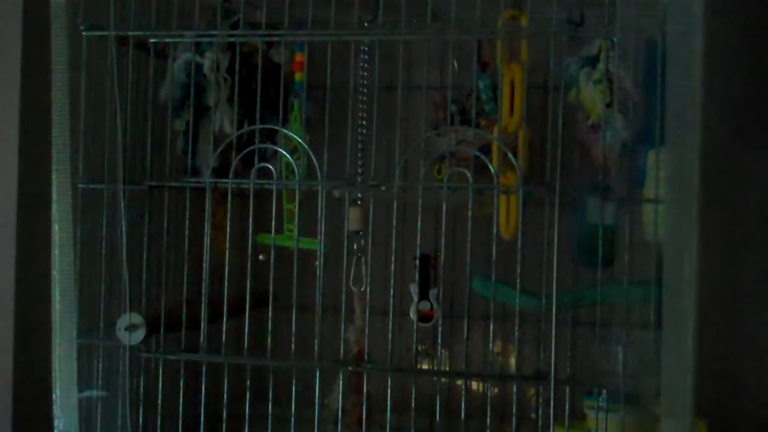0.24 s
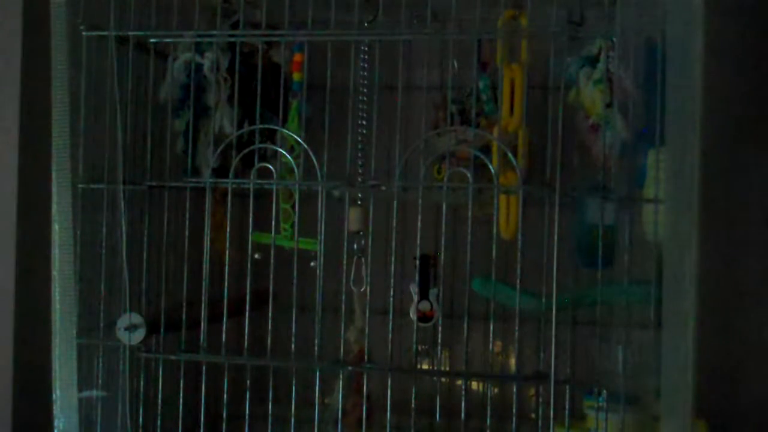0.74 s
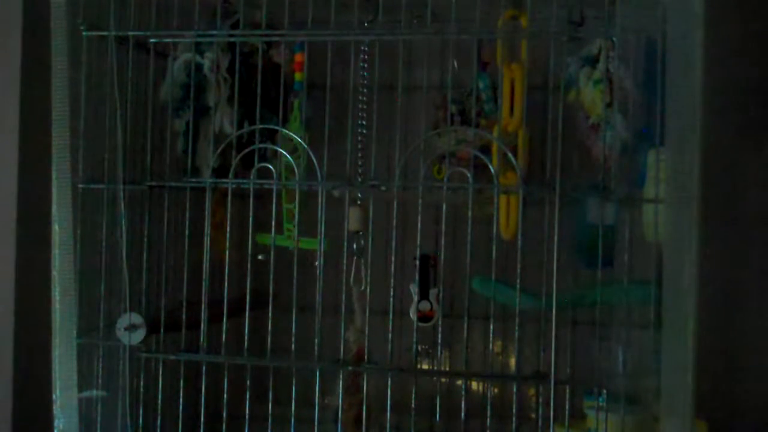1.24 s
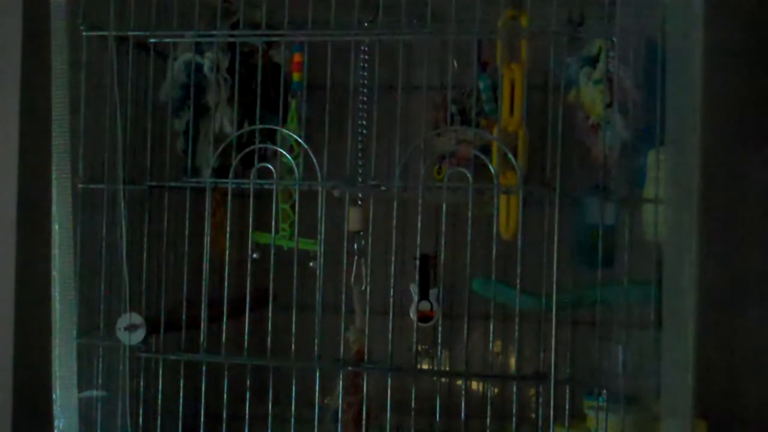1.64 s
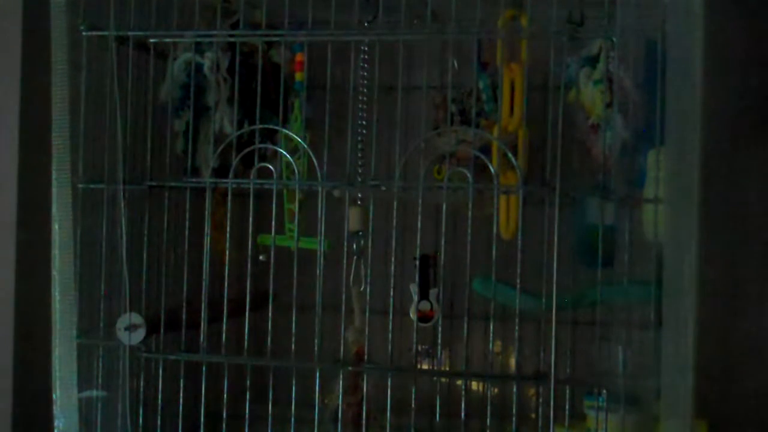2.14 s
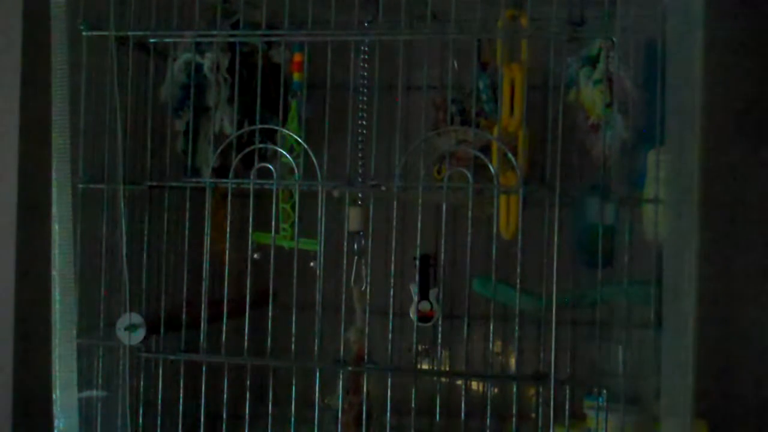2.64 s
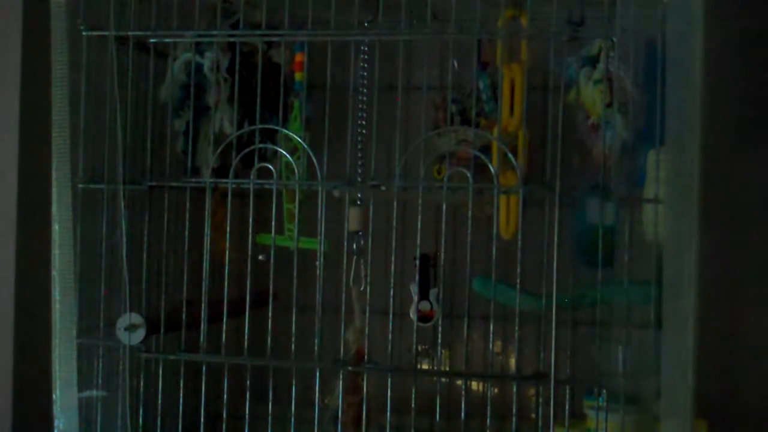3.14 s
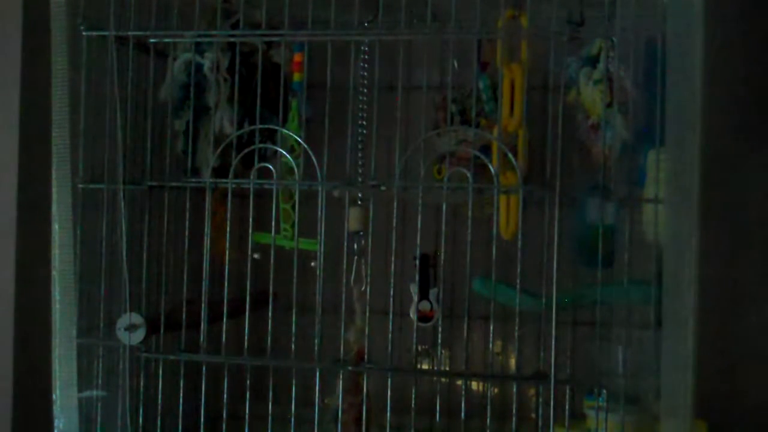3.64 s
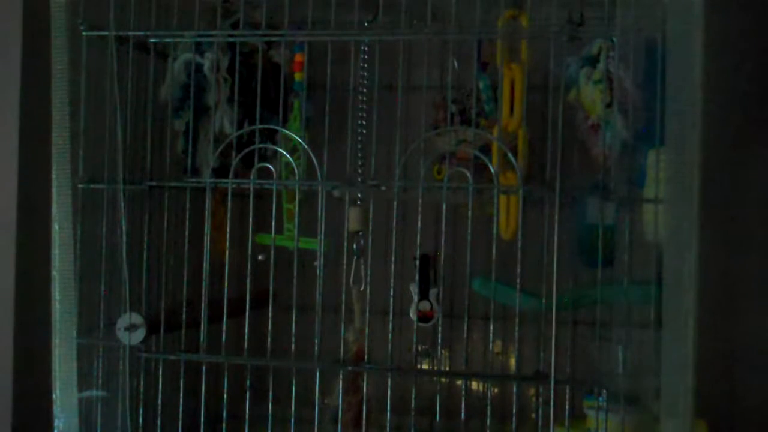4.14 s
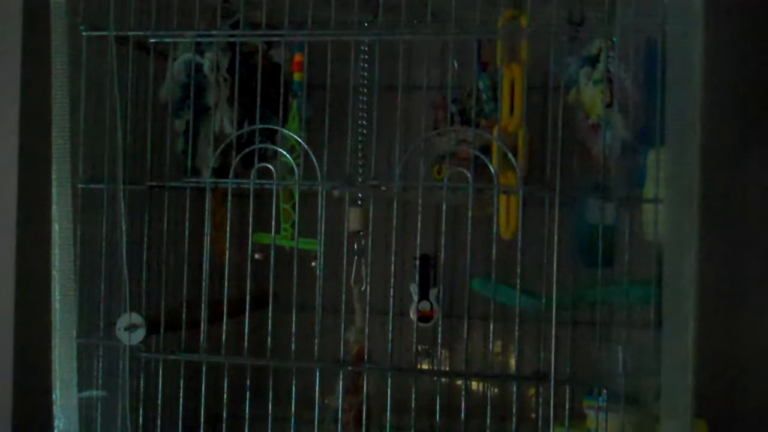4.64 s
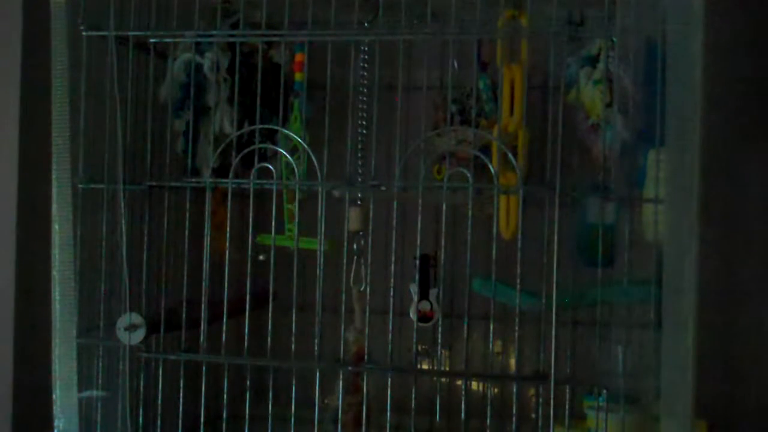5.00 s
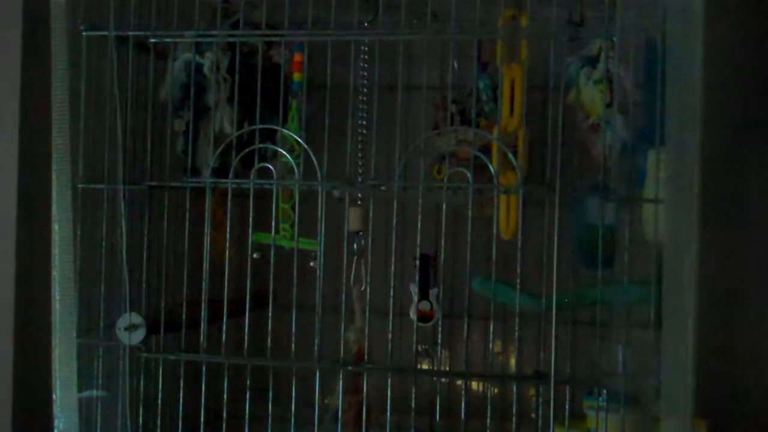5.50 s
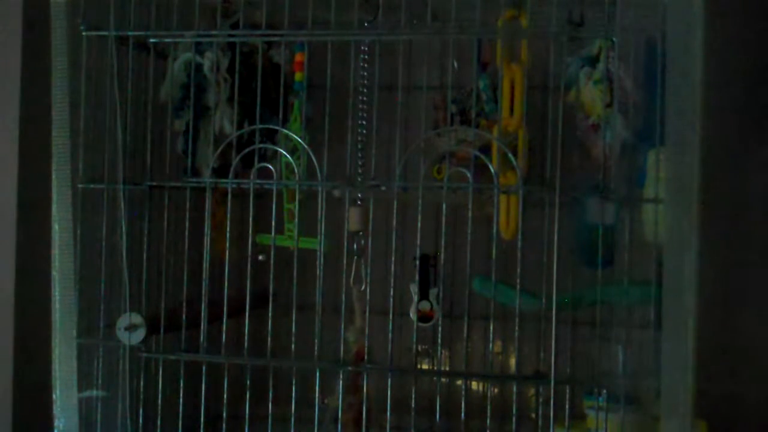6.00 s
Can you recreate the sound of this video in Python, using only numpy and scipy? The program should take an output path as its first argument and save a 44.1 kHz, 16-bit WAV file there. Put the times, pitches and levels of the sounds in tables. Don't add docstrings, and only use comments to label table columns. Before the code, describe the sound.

Scratchy claw bursts, feather rustle and one hard crash against cage bars, a second short flurry, then sparse ticks over faint hiss and whine.

```python
import sys
import numpy as np
from scipy import signal
from scipy.fft import rfft, irfft, next_fast_len
from scipy.io import wavfile
from scipy.ndimage import uniform_filter1d

SR = 44100
rng = np.random.default_rng(int(sys.argv[2]) if len(sys.argv) > 2 else 0)


def bounce(signal):
    frames = np.transpose(np.atleast_2d(signal))
    limited = np.clip(frames, -1, 1)
    pcm = np.round(limited * 32767).astype(np.int16)
    wavfile.write(sys.argv[1], SR, pcm)


def magnitude_from_level(level_db):
    exponent = np.asarray(level_db, float) / 20
    return 10 ** exponent


N = 276066
CRACKLE_DB = 1.5
SIDES = np.array([[1], [-1]])


def colour(x, points):
    hz, db = np.transpose(points)
    size = next_fast_len(x.shape[-1])
    f = np.fft.rfftfreq(size, 1 / SR)
    gain = magnitude_from_level(np.interp(np.log(f + 1), np.log(hz), db))
    return irfft(rfft(x, size) * gain, size)[..., :x.shape[-1]]


def unit(x):
    return x / np.sqrt(np.mean(x ** 2))


def band(x, lo_hz, hi_hz):
    return signal.sosfilt(signal.butter(2, [lo_hz, hi_hz], "bandpass", fs=SR, output="sos"), x)


def walk(rate):
    k = int(SR / rate)
    held = np.repeat(rng.standard_normal(N // k + 1), k)
    return uniform_filter1d(held, k)[:N]


def crackle(count, spread_db):
    size_db = spread_db * np.minimum(rng.exponential(size=count), 3.0)
    return unit(rng.standard_normal(count) * magnitude_from_level(size_db))


def wide(count, spread_db):
    unlike = .7
    return crackle(count, spread_db) + unlike * crackle(count, spread_db) * SIDES


def add(out, s, x):
    i = int(s * SR)
    out[..., i:i + x.shape[-1]] += x[..., :N - i]


def hiss():
    # f/Hz, level per Hz/dB
    hiss_colour = [(55, -7.5), (180, -2), (450, -4), (900, -3.5), (1700, -7.5), (4000, -12.5), (9000, -17),
                   (14200, -18)]
    # f/Hz, difference/dB
    balance = [(60, -1), (400, 5), (2300, 5), (5000, 1.2), (14000, 0.5)]
    noise = rng.standard_normal((2, N)) + 0.59 * band(rng.standard_normal(N), 80, 960)
    noise = magnitude_from_level(-60.5) * unit(colour(noise, hiss_colour))
    left = colour(noise[0], [(hz, db / 2) for hz, db in balance])
    right = colour(noise[1], [(hz, -db / 2) for hz, db in balance])
    return np.array([left, right])


def whine():
    tone_hz = [3935, 6681, 7000, 7752, 7854, 7881, 8000, 9000, 11806]
    # left level/dB, right level/dB, width/Hz
    tones = [(-85, -84, 3), (-100, -88, 40), (-92, -83, 4), (-80, -91, 6), (-74, -81, 5), (-73, -81, 5),
             (-72, -85, .6), (-94, -103, 3), (-78, -78, 1.5)]
    out, t = 0, np.arange(N) / SR
    for hz, (left_db, right_db, width) in zip(tone_hz, tones):
        drift = np.cumsum(rng.standard_normal(N)) * np.sqrt(2 * np.pi * abs(width) / SR)
        level = 2 ** .5 * magnitude_from_level(np.array([[left_db], [right_db]]))
        out = out + level * np.sin(2 * np.pi * hz * t + drift)
    return out


def flutter():
    # t/s, effort/dB, weight on the tray/dB
    moves = [(0.0, -35, -13), (.17, -41, -4), (.86, -40.5, -8), (1.02, -39, -4), (1.15, -48, 2),
             (1.25, -44, 0), (1.36, -46, 0), (1.58, -57, 2), (1.74, -45, -18), (1.87, -57, -10),
             (2.0, -48, -16), (2.26, -59, -14), (2.53, -57, -8), (2.68, -39, -12), (2.9, -41, -4),
             (3.25, -60, 6), (3.93, -67, -12), (4.6, -76, -12)]
    # f/Hz, level per Hz/dB
    rustle = [(30, -20), (85, -9), (2000, -5), (3500, -3), (5000, -6), (7500, -1.5), (10000, -6),
              (14000, 1)]
    # f/Hz, level per Hz/dB
    rattle = [(400, -33), (800, -1.5), (1300, 0), (2200, -1.5), (3500, -6), (6000, -37)]
    # f/Hz, level per Hz/dB
    rumble = [(45, -30), (82, -10), (175, -21), (235, -1), (420, 2), (700, -2.5), (1200, -33.5)]
    # offset/dB, share of the weight that the layer follows
    layers = [
        (3.5, -.2),
        (-3.5, -.1),
        (1, .9),
    ]
    flickers = (2.5, 2.0, 1.0)
    s, effort, weight = np.transpose(moves)
    sources = (wide(N, 2.9), crackle(N, 6.6), crackle(N, 1.26))
    out, t = 0, np.arange(N) / SR
    for (offset_db, share), slips, points, flicker_db in zip(layers, sources, (rustle, rattle, rumble), flickers):
        db = np.interp(t, s, effort + offset_db + share * weight, right=-120)
        db = db + flicker_db * (walk(35) + 0.43 * walk(160))
        out = out + magnitude_from_level(db - 8.0) * unit(colour(slips, points))
    return out


def puffs():
    # t/s, peak level/dB, f/Hz, length/s
    beats = [(.0, -58, 140, .08), (.22, -58, 85, .1), (.75, -59, 78, .1), (1.06, -57, 85, .18),
             (2.59, -60, 160, .07), (2.64, -53, 150, .08), (2.9, -54, 160, .08), (.57, -60, 62, .12),
             (.97, -63, 62, .1), (2.58, -61, 68, .13), (1.33, -60, 80, .12), (2.84, -60, 75, .1)]
    out, t = np.zeros(N), np.arange(SR // 3) / SR
    for s, db, hz, length in beats:
        swell = np.sin(np.pi * np.minimum(t / length, 1)) ** 2
        add(out, s, magnitude_from_level(db) * swell * np.sin(2 * np.pi * hz * t))
    return out


def scratches():
    # t/s, peak level/dB, share in the bars/dB, time to fade by 60 dB/s
    first_bout = [(.012, -17, -10, .05), (.0598, -23, -8, .05), (.1276, -27, -6.5, .056),
                  (.1345, -18, -26, .04), (.188, -24.5, -9.5, .039), (.203, -29, -24, .036),
                  (.246, -22.5, -14.5, .05), (.2862, -21.5, -7, .1), (.3144, -33.5, -3, .049),
                  (.3344, -29, -6.5, .059), (.3848, -26.5, -1, .034), (.4175, -28.5, -10, .04),
                  (.437, -31, -10, .03), (.515, -32, -16, .08), (.5536, -33.5, -8, .039),
                  (.5755, -27, -7, .088), (.6053, -21, -5.5, .1), (.639, -25, -4, .079),
                  (.6563, -35, -21, .065), (.7049, -28.5, -4, .049), (.766, -21, -5, .08),
                  (.94, -26.5, -15, .05), (.9612, -22.5, -1.5, .057), (1.0043, -27, -3, .077),
                  (1.0876, -33, -9, .082), (1.1096, -30.5, -5, .14), (1.1551, -34, -6.5, .18),
                  (1.2257, -29, -4.5, .073), (1.278, -27, -5, .08)]
    # t/s, peak level/dB, share in the bars/dB, fade time/s
    crash = [(1.3128, -26, -5, .06), (1.3167, -23, -14, .03), (1.3353, -7, -7, .13),
             (1.4735, -36, -23, .13), (1.5215, -32, -5, .12), (1.635, -44, -17, .065),
             (1.6535, -39, -11, .035), (1.6853, -26, -10, .056), (1.7595, -36, -13, .1),
             (1.8, -39, -16, .12), (1.8946, -43.5, -16, .048), (1.922, -35.5, -10, .065),
             (1.958, -36, -26, .059), (1.935, -39, -16, .05), (1.9839, -26, -9, .07), (2.005, -34, -10, .1),
             (2.0849, -32.5, -17, .05), (2.1131, -36.5, -15, .059), (2.1748, -41.5, -3.5, .12),
             (2.221, -46, -25, .05), (2.3095, -44.5, -9, .15), (2.3437, -44, -9, .08),
             (2.405, -46, -10, .15)]
    # t/s, peak level/dB, share in the bars/dB, fade time/s
    last_bout = [(2.5228, -42.5, -6, .2), (2.5496, -37, -9, .19), (2.597, -34, -9, .04),
                 (2.6131, -31, -3, .1), (2.628, -35, 0, .05), (2.6643, -15, -7, .045),
                 (2.682, -27, -6, .05), (2.7147, -27.5, -2, .049), (2.7463, -33, .5, .058),
                 (2.7614, -25.5, -5.5, .06), (2.7939, -22.5, -3, .11), (2.8577, -24, -13, .033),
                 (2.8978, -32.5, -6.5, .11), (2.937, -30, -18, .03), (2.9445, -23, -13, .05),
                 (2.96, -30, -15, .04), (2.9778, -21.5, -16, .06), (2.995, -30, -12, .1),
                 (3.0783, -45, -11, .14), (3.1, -42, -4, .1), (3.1188, -40, -4, .096)]
    # t/s, peak level/dB, share in the bars/dB, fade time/s
    settling = [(3.2779, -41, 4.5, .02), (3.344, -46.5, -6.5, .14), (3.379, -47.5, -9, .098),
                (3.5129, -48, -16, .15), (3.6975, -35.5, -12, .09), (3.792, -47, -19, .079),
                (3.9097, -51.5, -5.5, .092), (3.9486, -44.5, -14, .2), (4.1979, -48, -10, .085),
                (4.3203, -50, -9, .098), (4.3408, -42.5, -14, .14), (4.8878, -46.5, -22, .012),
                (5.344, -52, -8, .059), (5.3526, -49, -11, .14)]
    claw, bars, t = np.zeros(N), np.zeros(N), np.arange(SR // 5) / SR
    for s, db, bars_db, t60 in first_bout + crash + last_bout + settling:
        rise = max(.0006 - .000075 * db, 1e-4)
        shape = (1 - np.exp(-t / rise)) ** 2 * magnitude_from_level(-60 * t / max(t60, .005))
        power = (magnitude_from_level(db - 16.8) * shape / shape.max()) ** 2
        add(claw, s - .0015, power)
        add(bars, s - .0015, power * magnitude_from_level(bars_db + 9.8) ** 2)
    slips = wide(N, CRACKLE_DB)
    bright = unit(band(band(slips, 5800, 12000), 4200, 19000))
    wires = magnitude_from_level(-4.0) * unit(band(wide(N, CRACKLE_DB), 3300, 5600))
    bar_slips = slips[0] + .55 * (slips - slips[0])
    dull = unit(band(band(bar_slips, 590, 2700), 300, 3300))
    return np.sqrt(claw) * bright + (claw * bars) ** .25 * wires + np.sqrt(bars) * dull


def taps():
    # t/s, peak level/dB, f/Hz, time to fade by
    # 60 dB/s
    hard_taps = [(3.2786, -37, 3000, .006), (3.2812, -35, 1150, .013), (3.2932, -45, 1100, .012),
                 (3.3055, -46, 1050, .012), (1.0125, -27, 1500, .012), (1.0215, -24, 1000, .012),
                 (1.0315, -26, 900, .012), (1.066, -31, 900, .012), (1.0905, -29, 900, .01),
                 (.965, -25, 2050, .03), (.3845, -31, 2700, .04), (.9405, -37, 6800, .008),
                 (1.2265, -44, 6000, .008), (2.0855, -44, 7300, .008), (2.598, -45, 6500, .008),
                 (2.978, -35, 6800, .01), (2.9, -31, 700, .012), (2.951, -34, 1200, .02),
                 (1.961, -52, 6900, .01), (2.1145, -47, 7000, .006), (2.666, -30, 650, .06),
                 (2.666, -29, 7600, .02), (1.34, -24, 1240, .04), (1.3395, -17, 980, .05),
                 (.0135, -30, 7000, .012), (.059, -33, 6800, .006), (.2475, -34, 7000, .008),
                 (.2035, -38, 7500, .008), (5.354, -60, 1420, .06), (4.342, -57, 1400, .07),
                 (4.8878, -63, 6000, .008), (4.344, -58, 4450, .05), (4.353, -58, 7900, .02),
                 (.3365, -30, 3100, .012)]
    # t/s, peak level/dB, f/Hz
    pricks = [(0.0144, -24, 4050), (0.0588, -25, 3640), (0.1336, -25, 4270), (0.1875, -34, 2830),
              (0.2478, -31, 5150), (0.2848, -29, 5420), (0.3157, -31, 2740), (0.3346, -30, 3080),
              (0.384, -28, 2640), (0.5162, -36, 5200), (0.5756, -32, 2510), (0.6055, -29, 2750),
              (0.61, -27, 3700), (0.6404, -31, 3160), (0.7078, -30, 3730), (0.7647, -30, 3290),
              (0.9428, -30, 3140), (0.9607, -28, 3940), (1.0056, -32, 2630), (1.1199, -32, 3250),
              (1.2246, -33, 2900), (1.262, -32, 3120), (1.278, -28, 3220), (1.3124, -17, 4100),
              (1.3369, -15, 4770), (1.5219, -40, 3860), (1.6357, -41, 5330), (1.6871, -34, 2820),
              (1.8397, -42, 2900), (1.919, -45, 5260), (1.9824, -37, 3930), (1.9889, -34, 5070),
              (2.5257, -47, 3140), (2.5975, -38, 3630), (2.6155, -34, 2570), (2.6643, -20, 2940),
              (2.7087, -31, 3480), (2.7142, -28, 2680), (2.7482, -33, 2930), (2.794, -28, 3240),
              (2.8973, -38, 4640), (2.9437, -33, 3140), (2.9781, -33, 4190), (3.1118, -43, 2680)]
    top_db, prick_db, prick_t60 = -25, -4, .008
    contacts = hard_taps + [(s, min(db, top_db) + prick_db, hz, prick_t60) for s, db, hz in pricks]
    out, t = np.zeros(N), np.arange(SR // 20) / SR
    for s, db, hz, t60 in contacts:
        add(out, s, magnitude_from_level(db - 60 * t / max(t60, .003)) * np.sin(2 * np.pi * hz * t))
    return band(out, 350, 15000)


def strike(hz, size, t60, contact):
    t = np.arange(int(SR * t60.max() * .6)) / SR
    touch = np.arange(SR // 8) / SR / max(contact, 2e-4)
    fade = magnitude_from_level(-60 * t / np.maximum(t60, .005))
    ring = np.sum(size * np.sin(2 * np.pi * hz * t) * fade, axis=0)
    chatter = crackle(len(touch), 3.92) * touch * np.exp(-touch)
    sound = signal.fftconvolve(ring, chatter)
    return sound / abs(sound).max()


def thuds():
    # t/s, peak level/dB, centre f/Hz, time to fade by 60 dB/s
    body_blows = [(.014, -23.5, 1110, .04), (.065, -29, 1083, .048), (.131, -25, 1050, .05),
                  (.189, -39, 700, .07), (.292, -29.5, 588, .11), (.595, -25, 570, .087),
                  (.644, -32, 764, .12), (.707, -27, 1360, .047), (.77, -25, 770, .098),
                  (.961, -20.5, 1760, .058), (1.089, -28, 620, .2), (1.338, -15, 1900, .04),
                  (1.342, -15, 1250, .05), (1.529, -45, 1040, .086), (1.665, -29, 700, .12),
                  (1.754, -37, 320, .24), (1.98, -42, 973, .16), (2.094, -35, 760, .071),
                  (2.432, -43, 880, .14), (2.524, -39, 832, .36), (2.618, -37, 1670, .098),
                  (2.663, -26, 1830, .041), (2.719, -40, 1840, .13), (2.77, -31, 650, .083),
                  (2.799, -25, 1600, .1), (2.897, -26, 620, .062), (2.95, -32, 571, .11),
                  (3.119, -36, 458, .088), (3.17, -40, 1200, .067), (3.951, -44.5, 1744, .077)]
    # t/s, peak level/dB, centre f/Hz, fade time/s, contact/s
    slides = [
        (.965, -26, 560, .09, .008),
        (1.66, -33, 800, .09, .006),
        (1.822, -34, 2200, .05, .02),
    ]
    # t/s, peak level/dB, centre f/Hz, fade time/s, contact/s
    panels = [(1.338, -18, 323, .25, .004), (1.672, -31.5, 328, .26, .021), (1.825, -44, 996, .1, .016),
              (1.825, -45, 1320, .1, .016), (1.822, -41, 1920, .06, .016), (1.825, -37, 2310, .07, .015),
              (1.825, -43, 2710, .07, .016), (1.825, -42, 2900, .07, .016), (1.012, -31, 850, .15, .012),
              (1.03, -30, 460, .2, .014), (2.808, -23, 420, .2, .01), (2.87, -27, 430, .2, .018),
              (1.086, -28, 850, .13, .012), (1.338, -18, 980, .06, .005), (1.337, -16, 2120, .04, .003),
              (2.8, -27, 2200, .05, .005), (2.8, -28, 1190, .06, .005), (3.94, -49, 2420, .06, .018),
              (4.322, -50, 2200, .06, .004), (4.322, -55, 1350, .06, .004), (4.342, -49, 1357, .07, .005),
              (4.342, -53, 4450, .04, .004), (5.345, -54, 1427, .05, .012), (5.354, -54, 3480, .04, .006)]
    blows = [(*row, .007, .6) for row in body_blows]
    blows += [(*row, .42) for row in slides]
    blows += [(*row, 50 / row[2]) for row in panels]
    out = np.zeros(N)
    for s, db, hz, t60, contact, spread in blows:
        place = np.linspace(-2, 2, num=21)[:, None] + .05 * rng.standard_normal((21, 1))
        ratio = 2 ** (spread * place)
        centre_db = 4 * (abs(place) < .08)
        size = magnitude_from_level(-4.0 * place ** 2 + centre_db)
        sound = strike(hz * ratio, size, t60 / ratio ** .6, contact)
        add(out, s - .002, magnitude_from_level(db - 6.5) * sound)
    return band(band(out, 330, 9000), 180, 12000)


def snaps():
    # t/s, peak level/dB, time to fade by 60 dB/s
    feather_snaps = [(.0598, -41, .03), (.1361, -37, .03), (.1875, -41, .03), (.2892, -39, .03),
                     (.5756, -39, .03), (.607, -40, .03), (1.0869, -46, .03), (1.3384, -33, .11),
                     (1.9839, -43, .03), (2.6655, -28, .05), (2.6855, -36, .04), (2.7677, -37, .04),
                     (2.7955, -37, .05), (2.856, -30, .04), (2.9279, -36, .03), (2.9455, -33, .05),
                     (2.9785, -35, .05)]
    power, t = np.zeros(N), np.arange(SR // 10) / SR
    rise = 1 - np.exp(-t / .0012)
    for s, db, t60 in feather_snaps:
        fade = magnitude_from_level(db - 6.0 - 60 * t / max(t60, .005))
        add(power, s - .002, (fade * rise) ** 2)
    return np.sqrt(power) * unit(band(band(wide(N, CRACKLE_DB), 10000, 19000), 9000, 19000))


def ticks():
    # t/s, peak level/dB, low tone f/Hz, high tone f/Hz
    bar_ticks = [(.065, -30, 1080, 3600), (.291, -16.5, 536, 3170), (.314, -24, 1640, 2750),
                 (.336, -20.5, 1410, 3080), (.383, -27.5, 1460, 2580), (.596, -19.5, 623, 2540),
                 (.609, -26, 1420, 3700), (.769, -21, 750, 2450), (.963, -19, 1650, 2350),
                 (1.119, -35, 726, 3230), (1.226, -33, 1650, 3560), (1.277, -26, 1640, 3300),
                 (1.313, -28, 2180, 2910), (1.337, -9, 2140, 2450), (1.983, -32, 990, 2580),
                 (2.178, -39.5, 1615, 2490), (2.551, -36, 1100, 2950), (2.664, -34, 1860, 3020),
                 (2.751, -28, 1280, 2930), (2.8, -37, 2140, 2410), (3.281, -40, 980, 1400),
                 (3.697, -46, 1730, 2900), (4.323, -50, 1350, 4380), (4.342, -45, 1357, 4430),
                 (5.354, -55, 1400, 3480)]
    out, t = np.zeros(N), np.arange(SR // 8) / SR
    for s, db, low_hz, high_hz in bar_ticks:
        start = 2 * np.pi * rng.random(2)
        high_db = -3 - 5.5 * np.log2(high_hz / low_hz)
        low = np.sin(2 * np.pi * low_hz * t + start[0])
        high = magnitude_from_level(high_db) * np.sin(2 * np.pi * high_hz * t + start[1])
        ring = (low + high) * (1 - np.exp(-t / 0.00093)) * magnitude_from_level(-60 * t / .032)
        click = magnitude_from_level(-5.5) * rng.standard_normal(len(t)) * np.exp(-t / 0.00092)
        add(out, s - .001, magnitude_from_level(db - 3.5) * (ring + click))
    return band(out, 500, 6500)


def sweeps():
    # t/s, level/dB, centre f/Hz, time to fade by 60 dB/s, swell/s
    drags = [
        (1.004, -34.5, 800, .42, .006),
        (1.005, -40, 1500, .35, .004),
        (1.05, -40, 420, .7, .02),
        (2.81, -45, 400, 1.1, .02),
        (2.8, -46, 1200, 1.1, .008),
        (1.342, -34, 1100, .15, .004),
    ]
    octaves, darkening = .55, .7
    out, t = np.zeros(N), np.arange(SR // 2) / SR
    for s, db, hz, t60, swell in drags:
        sound = 0
        rise = (1 - np.exp(-t / max(swell, 1e-3))) ** 2
        for place in np.linspace(-2, 2, num=9):
            ratio = 2 ** (octaves * place)
            fade = rise * magnitude_from_level(-60 * t * ratio ** darkening / t60)
            hiss_band = unit(band(crackle(len(t), 2.0), hz * ratio / 1.12, hz * ratio * 1.12))
            sound = sound + magnitude_from_level(db - 4.0 * place ** 2) * fade * hiss_band
        add(out, s, sound)
    return band(out, 230, 9000)


def room():
    # f/Hz, time to fade by 60 dB/s, level/dB
    echo = [(200, 0.32, -3), (800, 0.41, 0), (2500, 0.34, -3.5), (7000, 0.25, -1), (14000, 0.45, -34.5)]
    hz_points, t60s, dbs = np.transpose(echo)
    t, tail = np.arange(SR // 2) / SR, 0
    for hz in 60 * 2 ** np.arange(0, 8.1):
        mid, side = band(rng.standard_normal((2, len(t))), hz / 2 ** .5, min(hz * 2 ** .5, 20000))
        t60 = np.interp(np.log(hz), np.log(hz_points), t60s)
        db = np.interp(np.log(hz), np.log(hz_points), dbs)
        fade = magnitude_from_level(-60 * t / t60) * (1 - np.exp(-t / 0.0005))
        fade = fade / np.sqrt(np.sum(fade ** 2))
        tail = tail + magnitude_from_level(db - 4.5) * fade * (mid + np.tanh(hz / 2500) * side * SIDES)
    return tail


def scene():
    tick = ticks() + taps()
    cage = sweeps() + scratches() + snaps() + thuds() + puffs() + flutter()
    to_walls = cage.mean(axis=0, keepdims=True) + magnitude_from_level(-7.5) * tick
    wet = signal.fftconvolve(to_walls, room(), axes=1)[:, :N]
    f = np.fft.rfftfreq(N, 1 / SR)
    left_lag = np.exp(-2j * np.pi * f * .00003)
    left = irfft(rfft(cage[0] + tick) * left_lag, N)
    return np.array([left, cage[1] + tick]) + wet


def cavity(hz, width):
    f = np.fft.rfftfreq(N, 1 / SR)
    return 1 / (1 - (f / hz) ** 2 + 1j * f * width / hz ** 2)


def top_cut(x):
    return signal.sosfilt(signal.butter(12, 14550, fs=SR, output="sos"), x)


def record(dry):
    # resonance f/Hz, width/Hz, gain/dB
    port_table = [
        (7850, 1500, -.8),
        (6580, 900, .5),
    ]
    ports = []
    for (hz, width, db), duct_hz in zip(port_table, (19000, 6600)):
        ports.append(magnitude_from_level(db) * cavity(hz, width) * cavity(duct_hz, 1.4 * duct_hz))
    x = irfft(rfft(dry) * np.array(ports), N) + hiss() + whine()
    x = signal.sosfilt(signal.ellip(12, .2, 50, 14200, fs=SR, output="sos"), x)
    return top_cut(x)


dry = scene()
out = record(dry)
bounce(out)
```